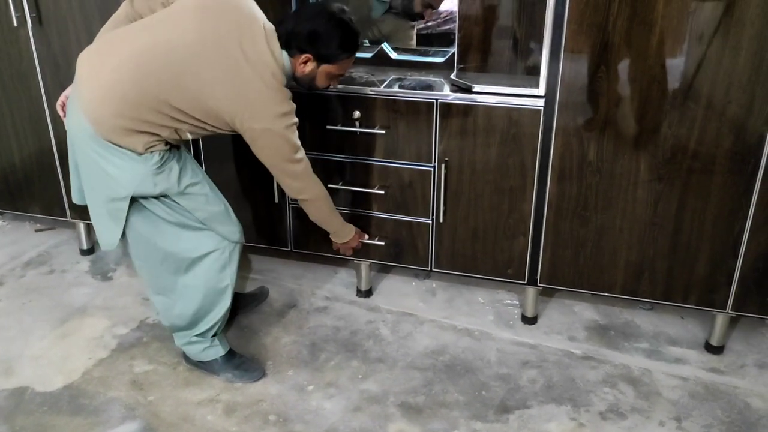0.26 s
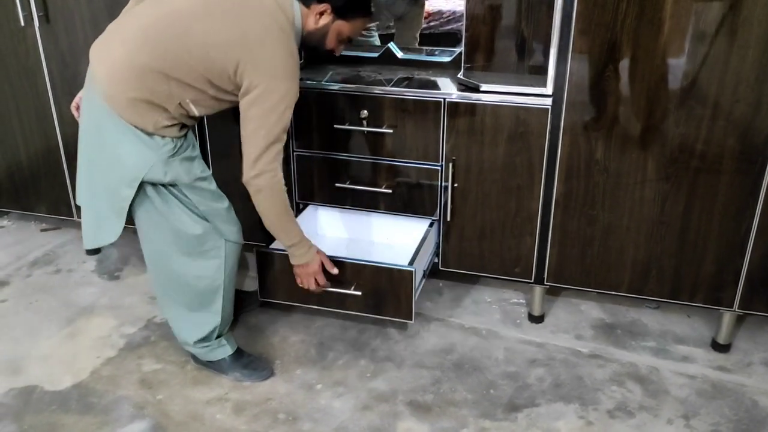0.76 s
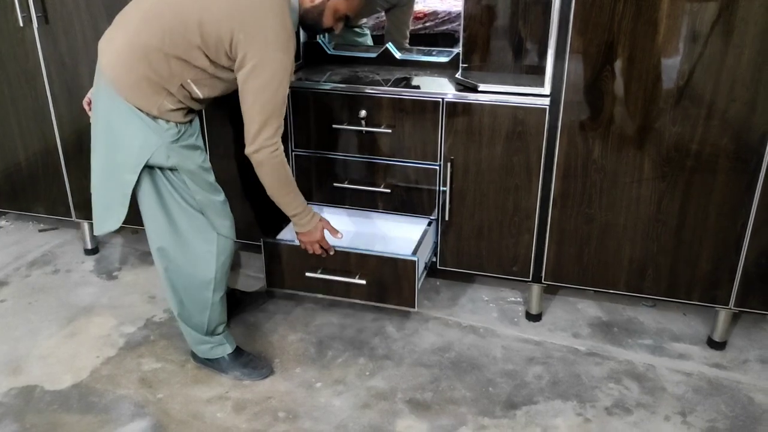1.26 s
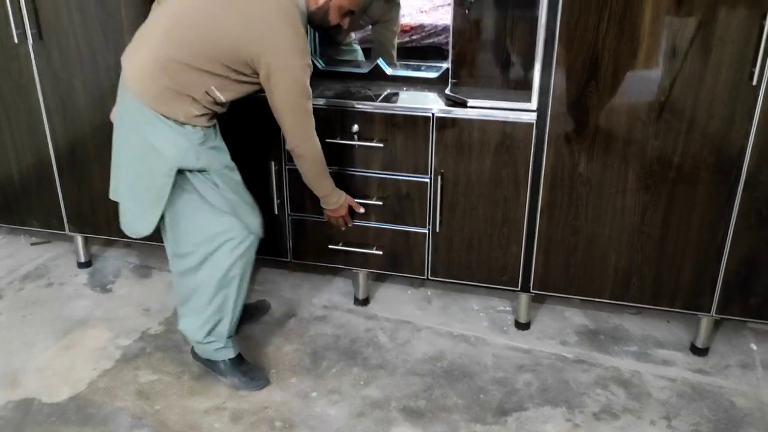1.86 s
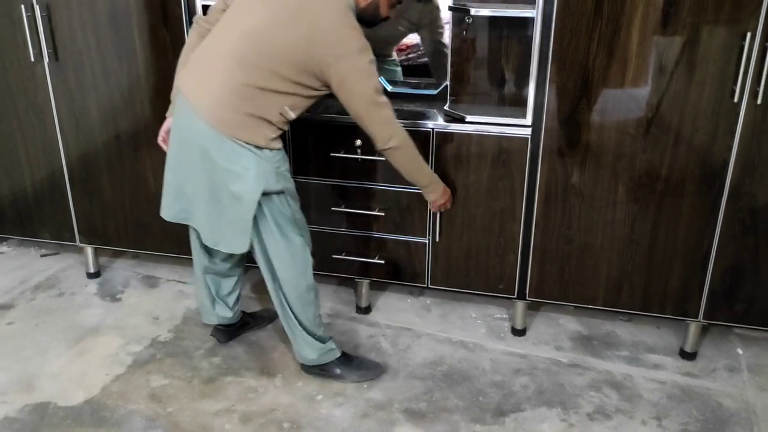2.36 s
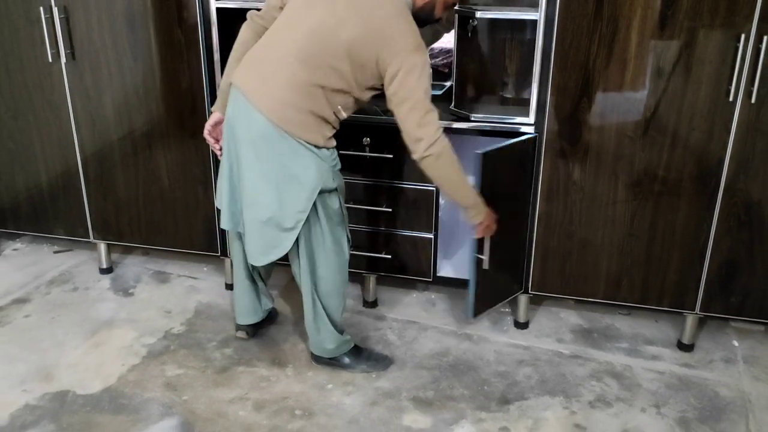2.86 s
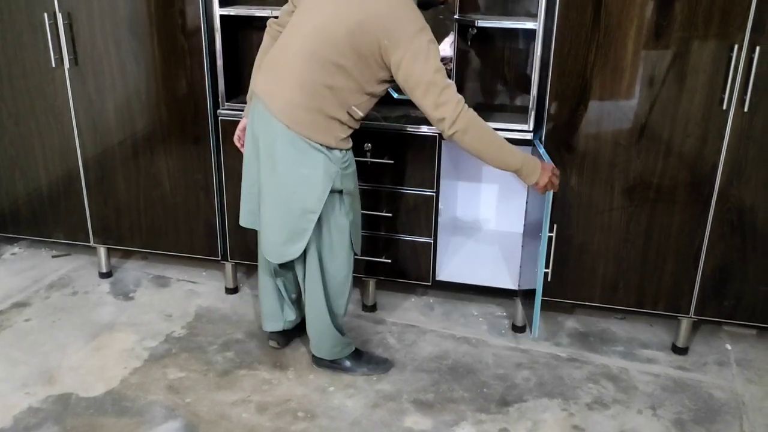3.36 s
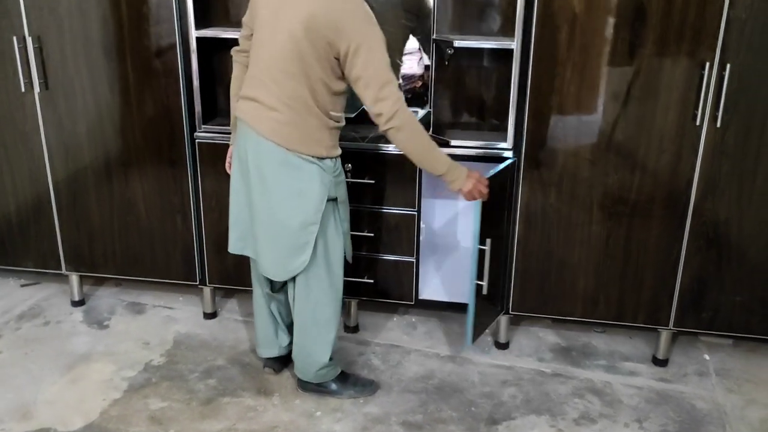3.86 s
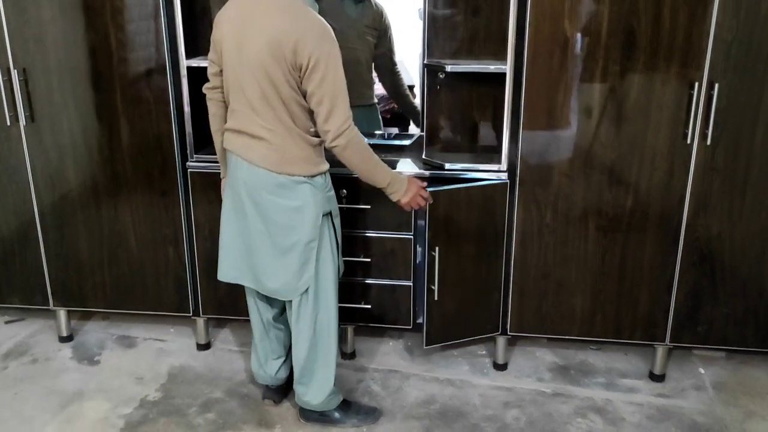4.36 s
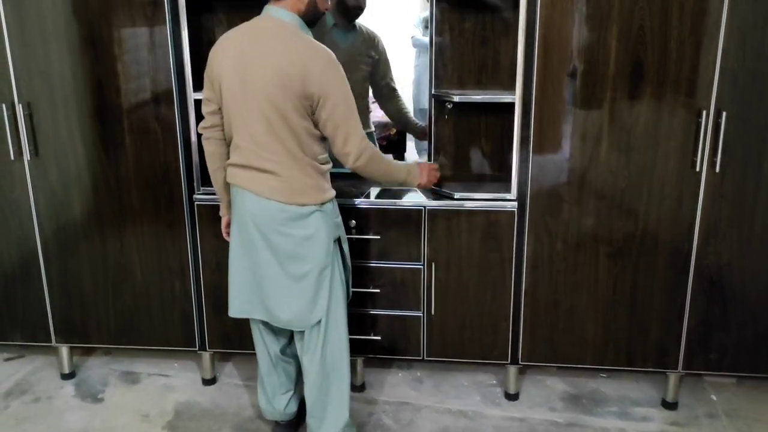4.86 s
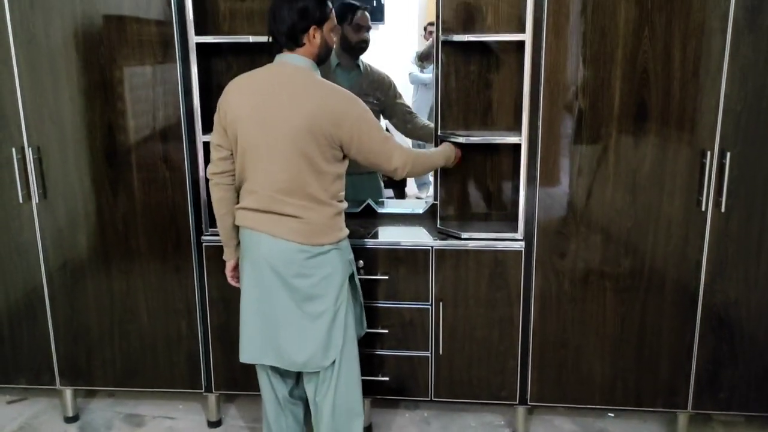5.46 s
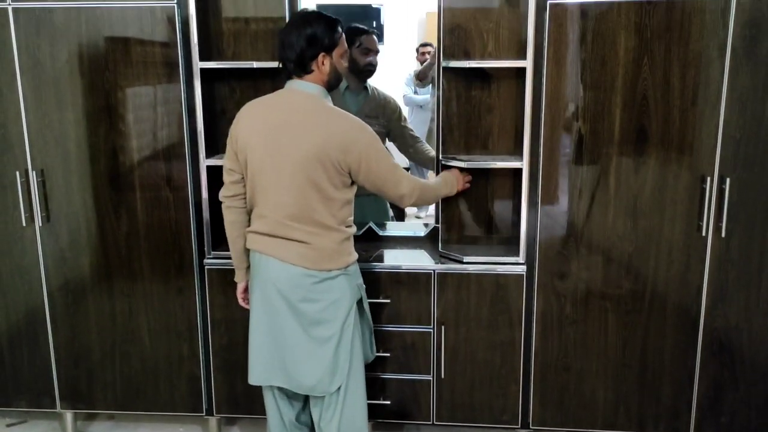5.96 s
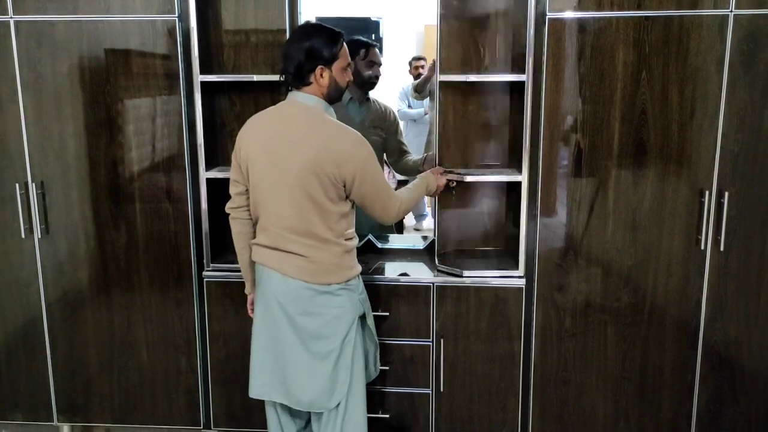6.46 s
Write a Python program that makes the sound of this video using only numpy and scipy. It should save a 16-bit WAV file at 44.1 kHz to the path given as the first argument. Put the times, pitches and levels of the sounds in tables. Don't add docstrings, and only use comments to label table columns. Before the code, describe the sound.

A wooden drawer rumbles on steel runners and bangs shut in an echoing workshop; then a cupboard door slams with a sharp crack, followed by clicks.

```python
import sys
import numpy as np
from scipy import signal
from scipy.fft import rfft, irfft, next_fast_len
from scipy.io import wavfile
from scipy.ndimage import uniform_filter1d, minimum_filter1d, map_coordinates

SR = 44100
rng = np.random.default_rng(int(sys.argv[2]) if len(sys.argv) > 2 else 0)


def digitize_waveform(pressure):
    field = np.atleast_2d(pressure).T
    bounded = np.clip(field, -1, 1)
    quanta = np.round(bounded * 32767).astype(np.int16)
    wavfile.write(sys.argv[1], SR, quanta)


def voltage_ratio(level):
    return 10 ** (np.asarray(level, float) / 20)


N = 296715

# t/s, click peak level/dB, then crack, knock and boom level/dB relative to the click
LOW_DRAWER_BLOWS = [
    (0.4667, -45, -4.5, -14, -22),
    (0.7014, -32.5, -15.5, -15, -32),
    (1.1852, -29, -5, 2.5, -5),
    (1.1914, -38, 8, 15.5, 2.5),
    (1.222, -45.5, -0.5, 9, 18.5),
    (1.4296, -36, -28.5, -31, -18),
    (1.5541, -39.5, -27, -14, -12),
    (1.7748, -36, -31, -41, -16),
]
MID_DRAWER_BLOWS = [
    (1.989, -51, 18.5, 20.5, 11.5),
    (1.9985, -46.5, 12, 5, 16),
    (2.202, -37, -9.5, -21, -20),
    (3.143, -60.5, -8, -18, -2),
    (3.975, -83, 7.5, 6.5, -19),
]
DOOR_BLOWS = [
    (4.1612, -10.5, -15.5, -11, -18),
    (4.1809, -19, -3.5, -14.5, -1.5),
    (4.556, -55.5, -23, -5, 6),
]
GLAZED_BLOWS = [
    (4.8668, -36, -9.5, -18, -28.5),
    (5.0105, -36, -3, -6, -6),
    (5.0145, -20, -7, -20, -22),
    (5.1752, -15, -13.5, -30.5, -37),
    (5.1785, -14.5, -13.5, -34.5, -48),
]
CATCH_BLOWS = [
    (5.8436, -37.5, -2, -9, -20),
    (6.0498, -49, -29, -16, -20.5),
]
TICK_BLOWS = [
    (0.0052, -34, -10, -7.5, -8),
    (0.2218, -43, -5, -13, 0),
    (0.5691, -36, -17.5, -18.5, -23),
    (0.6836, -40.5, -12.5, -10, -18.5),
    (0.7259, -32, -11, -18, -39),
    (1.3951, -35, -39.5, -13, -15),
    (1.6724, -39.5, -7, -20, -16),
]
# f/Hz, width/Hz, level/dB
LOW_DRAWER_WOOD = [(73, 9, -3), (158, 11, -4.5), (208, 8.4, -7), (265, 36, 6), (355, 25, 8),
                   (498, 570, -0.5), (538, 29, 8), (607, 13, 2), (744, 86, 6), (930, 230, -4),
                   (1342, 210, -8.5), (1560, 450, -7), (2900, 2600, -12)]
MID_DRAWER_WOOD = [(69.6, 6.6, 8), (114, 7.6, 7.5), (164, 23, 4), (297, 180, 9.5), (358, 19, 10),
                   (460, 38, -1.5), (560, 140, 10), (640, 68, 10.5), (830, 240, -2.5), (900, 72, -9),
                   (1500, 90, -3.5)]
DOOR_PANEL_WOOD = [(72, 6.7, 3), (172, 23, -2), (231, 12.4, 4), (305, 40, -2), (357, 25, 0.5),
                   (422, 12, -1.5), (504, 27, -2.5), (716, 110, -6.5), (1000, 120, -3.5), (1156, 70, -3.5),
                   (1420, 100, 2), (1750, 460, -5), (3000, 2000, -6)]
GLAZED_FRAME_WOOD = [(71, 2.4, 4.5), (164, 5.9, 5.5), (222, 12, -7), (266, 59, 2.5), (336.6, 33, 7),
                     (563, 180, -4.5), (712, 26, 4.5), (825, 42, -8.5), (1400, 400, -18.5)]
CATCH_PANEL_WOOD = [(328, 13, -10), (727, 40, -3), (890, 63, -12), (2050, 140, -8), (2590, 400, -8),
                    (2990, 170, -2.5), (3470, 300, -13)]
# f/Hz, width/Hz, level/dB
OPEN_DRAWER = [(148, 56, -10.5), (217.4, 44, 0.5), (285, 152, -6.5), (440, 190, -7), (655, 280, -7.5)]
# f/Hz, level/dB per Hz
CLICK_SPECTRUM = [(1940, -33.5), (3200, -21.5), (3990, -8), (4580, -9), (5020, -7), (7290, 1),
                  (8760, -12.5), (10300, -21), (14600, -26.5), (15800, -35)]
CRACK_SPECTRUM = [(500, -34), (850, -9), (1430, -9), (1600, -12), (2100, -6), (3050, -12.5), (3800, -14),
                  (4940, -30), (8360, -120)]
# t/s, level/dB, swell/s, f/Hz, left-right level/dB
STEEL_SNAPS = [(0.5692, -37, 0.0003, 4700, -7), (0.6838, -48, .0007, 6500, -6),
               (0.7003, -38, 0.00073, 7000, -11), (0.7275, -40, 0.00063, 6700, -11),
               (0.9952, -50, 0.002, 6850, 4), (1.001, -45, .0015, 7340, -11),
               (1.1846, -34.5, 0.00071, 4490, 3), (1.1872, -42, 0.0009, 7800, -6),
               (1.3958, -32.5, 0.00049, 4940, -3), (1.7752, -41.5, 0.00056, 6680, -8.5),
               (4.1606, -21.5, 0.0005, 6480, -7.5), (4.1616, -16.5, 0.00048, 8200, -2),
               (4.1632, -16.5, 0.00043, 7000, 1), (4.1652, -20.5, .0006, 6750, 3),
               (4.1772, -20, 0.0005, 6240, 8), (4.1808, -17, 0.00091, 8100, 2),
               (5.0132, -29, 0.00077, 6650, 0.5), (5.0156, -24, 0.00048, 6860, -10),
               (5.0188, -35, 0.00061, 7060, -4), (5.1766, -24, 0.00038, 7300, -15),
               (5.1783, -24.5, 0.00028, 7000, -6), (5.1791, -14, 0.00072, 6940, -9),
               (5.1807, -22, 0.00035, 6960, -11), (5.1822, -23.5, 0.00042, 7100, -8),
               (5.8436, -41, 0.0006, 6400, -7), (5.8462, -46, .001, 6970, -4), (2.7, -44, .0005, 6800, -3),
               (2.836, -46, .0005, 7000, -3), (2.875, -42, .0005, 7000, -3)]
# t/s, level/dB, swell/s, f/Hz, left-right level/dB
PANEL_KNOCKS = [(0.7268, -38, .0015, 1300, -6), (0.7272, -39, .0008, 2700, -2),
                (1.1842, -25, 0.0017, 1800, -2), (1.1862, -29.5, .0008, 2800, 3),
                (1.1965, -18.5, .002, 640, 3), (1.238, -28, .005, 330, 4), (1.995, -43, .004, 1800, -2),
                (2.012, -43, .006, 1420, -2), (2.029, -37, .002, 600, 5), (2.039, -32, .002, 420, -2),
                (2.066, -37.5, .004, 500, 1), (4.163, -24.5, .0012, 2050, -3), (4.1645, -27, .001, 3800, 3),
                (4.169, -37, .002, 900, 2), (4.183, -30.5, .003, 450, 3), (4.194, -23.5, .003, 330, 0),
                (4.202, -28.5, .003, 520, 6), (4.228, -30.5, .005, 420, 3), (4.21, -34, .004, 1430, -1),
                (4.175, -31, .003, 3890, -2.5), (5.1762, -29, .001, 3700, -2),
                (5.1795, -33.5, .001, 1900, -1.5), (5.847, -46, .002, 3060, 0.5),
                (5.858, -51, .006, 2900, 0), (5.872, -61, .02, 790, 2), (5.705, -61.5, .01, 200, 2),
                (5.765, -62.5, .008, 200, 4), (6.635, -65, .014, 330, 6), (6.705, -63.5, .01, 335, 5),
                (6.66, -62, .012, 140, 4), (1.69, -45.5, .008, 200, 4), (4.1855, -21, 0.00051, 1000, 2.5),
                (5.848, -65, 0.005, 10850, 0), (2.82, -52, 0.012, 3900, 0)]
# f/Hz, level/dB, t60/s
LOW_DRAWER_RING = [(212.6, -17, 0.73), (280, -16, 0.89), (319, -14.5, 0.9), (524, -12.5, 0.24),
                   (633, 1, 0.13), (742, -23.5, 0.63), (819, -4, 0.14), (912, -18.5, 0.45),
                   (1290, -36.5, 1.4), (1415, -20.5, 0.56)]
MID_DRAWER_RING = [(199.5, -15, 0.26), (330, -22, 0.14), (440, -23, .38), (558, -23, 0.28),
                   (647, -20, 0.28), (830, -26, .12), (1027, -28.5, 0.56)]
DOOR_PANEL_RING = [(309, -5, 0.46), (428.4, -3, 0.14), (497, -3.5, 0.14), (677, -16.5, 0.52),
                   (1160, -11, 0.2), (1404, -7.5, 0.25), (1460, -12, 0.35), (1780, -17.5, 0.57),
                   (2060, -6, 0.14), (2280, -36.5, 5.0)]
CATCH_PANEL_RING = [(710, -13, 0.1), (796, -31, 1.1), (960, -18.5, 0.64), (2150, -20, 0.29),
                    (2850, -22, 0.76), (3000, -2.5, 0.16)]
GLASS_RING = [(710, -46.5, 0.87), (331, -49, 1), (2250, -55, .5)]
# start t/s, length/s, board level/dB, sides over board level/dB
ROLL_STROKES = [(-.08, 0.2, -38.5, -8), (0.243, 0.061, -53.5, -17), (0.41, 0.32, -53, -9),
                (0.547, 0.27, -48.5, -2.5), (0.75, 0.21, -53, 5.5), (0.923, 0.087, -36, -19),
                (1.258, 0.083, -42, -25.5), (1.657, 0.22, -55.5, -6.5), (2.075, 0.069, -47.5, -20),
                (2.4, 0.29, -72, 1), (2.698, 0.12, -63, 6.5), (4.452, 0.19, -67, 0.5),
                (4.595, 0.11, -64, 1), (4.724, 0.095, -60, -4.5), (5.4, 0.74, -68.5, -6.5),
                (5.75, 0.25, -62.5, -23), (6.134, 0.36, -81.5, 7.5), (6.623, 0.076, -69.5, -5.5)]
# start t/s, length/s,
# grit level/dB, scrape over grit level/dB
SCUFF_STROKES = [(-.03, 0.08, -42.5, -6), (0.1, 0.056, -71.5, 14.5), (0.306, 0.37, -58.5, -5),
                 (0.47, 0.34, -57.5, 0.5), (0.673, 0.15, -42, -6), (0.85, 0.26, -53, -4.5),
                 (1.387, 0.066, -50.5, -26), (1.523, 0.029, -54, -5.5), (1.72, 0.079, -50, -8.5),
                 (1.842, 0.2, -44.5, -16), (2.066, 0.11, -45, -14), (2.256, 0.092, -57, 0.5),
                 (2.333, 0.39, -49, -6.5), (2.654, 0.25, -45, -9.5), (3.949, 0.062, -75, 3.5),
                 (4.417, 0.27, -63, 5), (4.729, 0.089, -66, 11), (4.857, 0.042, -54.5, 2),
                 (5.306, 0.25, -69, 4.5), (5.564, 0.098, -62, -5), (5.702, 0.16, -76, 4),
                 (5.85, 0.29, -67, -1), (6.202, 0.19, -68.5, -2), (6.441, 0.15, -66, -3.5)]
# start t/s, length/s, level/dB
SLAB_STROKES = [(-.05, 0.18, -49.5), (0.954, 0.1, -54.5), (1.24, 0.052, -40.5), (1.66, 0.1, -54),
                (1.92, .06, -51), (2.1, .1, -54.5), (2.392, 0.15, -60), (4.53, 0.14, -62),
                (5.046, 0.062, -52), (5.35, 0.1, -72), (5.957, 0.081, -72)]
IDLE_DB = [-72, -83.5, -77, -83, -79]
# f/Hz, level/dB per Hz
GRIT_SPECTRUM = [(1940, -33.5), (3300, -13), (4520, -12), (6110, -8), (7060, -4.5), (8930, -17),
                 (9860, -27), (12100, -34), (14800, -33.5), (15800, -39)]
SCRAPE_SPECTRUM = [(470, -14), (800, -5), (1130, -2), (1540, -4.5), (2830, -4), (3800, -14.5),
                   (4940, -24.5), (8360, -120)]
SLAB_SPECTRUM = [(20, -12.5), (40, -1.5), (72, -8.5), (100, -2.5), (140, -19), (300, -120)]
# t/s, level/dB, length/s
DRAWER_THROBS = [
    (0.947, -40, 0.061),
    (0.975, -30, 0.089),
    (1.017, -27, 0.035),
    (1.033, -32, 0.032),
    (1.056, -35, .035),
    (1.076, -27, 0.022),
    (1.097, -29.5, 0.019),
    (1.122, -42.5, 0.068),
    (1.153, -40, 0.042),
]
# start t/s, length/s, level/dB
HINGE_SLIPS = [
    (5.596, 0.068, -68.5),
    (5.642, 0.055, -60),
    (5.71, 0.066, -65.5),
]
# start t/s, length/s, level/dB
CLOTH_SWISHES = [
    (0.686, 0.13, -54.5),
    (1.4, 0.05, -63),
    (1.532, 0.04, -54.5),
    (2.373, 0.24, -59),
]
# f/Hz, level/dB per Hz
CLOTH_SPECTRUM = [(5000, -40), (8500, 2), (10000, -5), (15000, -13), (15800, -25.5)]
# start t/s, length/s, level/dB, f/Hz
MOTOR_NOTES = [
    (2.453, 0.77, -72, 121),
    (3.419, 0.31, -72, 170),
    (3.744, 0.27, -79, 158),
    (5.62, 0.11, -69, 189),
    (5.904, 0.12, -66, 167.6),
    (6.197, 0.52, -74.5, 137.2),
]
# f/Hz, level/dB per Hz
AIR_SPECTRUM = [(12, -30), (20, 3), (33, -15), (76, -9.5), (103, -32.5), (139, -8), (160, -9), (178, -8),
                (249, -32.5), (286, -26), (398, -25), (484, -28), (2550, -33), (7100, -40.5), (15000, -60)]
# f/Hz, t60/s
HALL_DECAY = [(60, 0.24), (160, 0.76), (420, 0.73), (1100, 0.7), (2910, 0.59), (7680, 0.5), (12000, 0.33)]
# f/Hz, left-right likeness
PAIR_LIKENESS = [(60, .96), (200, .95), (400, .85), (700, .6), (1300, -.2), (2400, .05), (4500, -.15),
                 (7200, -.05), (8500, .6), (12000, .05)]
# f/Hz, left-right level/dB
PAIR_TILT = [(60, 4.5), (150, 4.5), (380, 4.5), (950, 1), (2380, 0), (5980, -3.0), (15000, -2.5)]
# f/Hz, share
PHONE_GAPS = [(2200, 0), (3200, .12), (5000, .17), (6000, .1), (7800, .08), (8800, .5), (9800, .66),
              (11000, .58), (15500, .52)]

BOOM_HZ, SOFT_HZ = 225, 3570
SHEEN_HZ, TOP_HZ = 9400, 15550
LEFT_LATE_S = .00036
SNAP_SPREAD = .09
SCUFF_RISE, ROLL_RISE, SLAB_RISE = 0.46, 0.39, 0.28
SCUFF_FADE, ROLL_FADE, SLAB_FADE = 105, 115, 80
BOARD_HZ, BOARD_SAG = 222, 120
UPPER_HZ, UPPER_DB = 329, -11.5
GROAN_HZ, GROAN_SAG = 648, 20
RUMBLE_CUT_HZ = 32


def unit(x):
    return x / np.sqrt(np.mean(np.abs(x) ** 2) + 1e-20)


def along(points, hz):
    f, v = np.transpose(points)
    return np.interp(np.log(hz + 1), np.log(f + 1), v)


def wobble(rate):
    knots = rng.standard_normal(int(N * rate / SR) + 4)
    return map_coordinates(knots, [np.arange(N) * rate / SR])


def resonant(peaks, f):
    total = 0
    for k, (centre, width, db) in enumerate(peaks):
        damping = 1j * f * width
        total = total + (-1) ** k * voltage_ratio(db) * damping / (centre * centre - f * f + damping + 1e-9)
    return total


def left_right(db):
    return voltage_ratio(np.outer([.5, -.5], db))


def spread(pair, hz):
    turn = np.arccos(np.clip(along(PAIR_LIKENESS, hz), -.9, 1)) / 2
    mid, side = np.cos(turn) * pair[0], np.sin(turn) * pair[1]
    return np.array([mid + side, mid - side]) * left_right(along(PAIR_TILT, hz)) * voltage_ratio(-25 * (hz > TOP_HZ))


def rush(response, patchy_db, grain_db, rate):
    z = signal.stft(rng.standard_normal((2, N)), nperseg=512)[2]
    field = uniform_filter1d(rng.standard_normal(z.shape[1:]), size=6, axis=0)
    field = uniform_filter1d(field, size=10, axis=1)
    patchy = signal.istft(z * voltage_ratio(patchy_db * unit(field)), nperseg=512)[1][:, :N]
    pair = patchy * voltage_ratio(grain_db * wobble(rate))
    m = next_fast_len(N + 8192)
    hz = np.fft.rfftfreq(m, 1 / SR)
    return unit(irfft(spread(rfft(pair, m), hz) * response(hz), m)[:, :N])


def shaped_rush(spectrum, **grain):
    return rush(lambda hz: voltage_ratio(along(spectrum, hz)), **grain)


def strokes(start, length, db, rise, fade, rest_db=-120):
    t = np.arange(0, N + 64, 64) / SR - np.reshape(start, (-1, 1))
    length, db = np.reshape(length, (-1, 1)), np.reshape(db, (-1, 1))
    swell = np.clip(t / (np.clip(rise, .02, 1) * length), 0, 1)
    gain = swell * voltage_ratio(db - fade * np.maximum(t - length, 0))
    power = np.sum(gain ** 2, axis=0) + voltage_ratio(rest_db) ** 2
    return np.interp(np.arange(N) / 64, np.arange(len(power)), np.sqrt(power))


def echo(size):
    hz, t, z = signal.stft(rng.standard_normal((2, size)), SR, nperseg=256)
    decay = voltage_ratio(-60 * t / along(HALL_DECAY, hz)[:, None])
    tail = signal.istft(z * decay, SR, nperseg=256)[1][:, :size]
    tail = tail * (1 - np.exp(-np.arange(size) / SR / 0.0018))
    return tail / np.linalg.norm(tail[0])


def contacts(events, wood, direct_db, top_db, dull_db, pan_db, sheen_hz=SHEEN_HZ, lag_s=-.00012):
    out, m, lead = np.zeros((2, N + 2 * SR)), 65536, 256
    hz, t = np.fft.rfftfreq(m, 1 / SR), np.arange(1024) / SR
    tilt = along(PAIR_TILT, hz)
    highs = [p for p in wood if p[0] > BOOM_HZ]
    lows = [p for p in wood if p[0] <= BOOM_HZ] or wood[:1]
    knock = unit(resonant(highs, hz) / (1 + 1j * hz / SOFT_HZ) ** 2)
    boom = unit(resonant(lows, hz))
    standing = unit(boom * resonant([(c, 4 * w, 0) for c, w, db in lows], hz)) * left_right(tilt)
    click_shape = voltage_ratio(along(CLICK_SPECTRUM, hz) + top_db * (hz > sheen_hz))
    crack_shape = voltage_ratio(along(CRACK_SPECTRUM, hz) - dull_db * np.log2(1 + hz / 1000))
    lag = np.exp(np.outer([-1j, 1j], np.pi * hz * lag_s))
    direct = voltage_ratio(direct_db - 25 * (hz > TOP_HZ)) * left_right(pan_db + tilt) * lag
    for s, db, crack_db, knock_db, boom_db in events:
        envelope = voltage_ratio(-60 * t / 0.022) * np.minimum(t / 0.00026, 1)
        burst = rfft(rng.standard_normal(len(t)) * envelope, m)
        burst = burst / (np.abs(burst) + 1e-9) ** 0.73
        blow = voltage_ratio(-3.0) * unit(burst * click_shape) + voltage_ratio(crack_db + 0.5) * unit(burst * crack_shape)
        blow = blow + voltage_ratio(knock_db + 5.0) * knock + voltage_ratio(boom_db + 4.5) * boom
        path = direct + spread(rfft(echo(size=40000), m), hz)
        heard = irfft(blow * path + voltage_ratio(boom_db + 2.5) * standing, m)
        sound = np.roll(heard, lead, axis=1)[:, :SR]
        sound[:, :lead] *= np.linspace(0, 1, lead) ** 8
        start = round(s * SR)
        out[:, start:start + SR] += voltage_ratio(db + 23.5) * sound
    return out[:, lead:N + lead]


def drawers():
    low = contacts(LOW_DRAWER_BLOWS, LOW_DRAWER_WOOD, direct_db=-7.0, top_db=0.5, dull_db=6, pan_db=-3.5)
    middle = contacts(MID_DRAWER_BLOWS, MID_DRAWER_WOOD, direct_db=-15.0, top_db=3.5, dull_db=7.0, pan_db=0.5)
    ticks = contacts(TICK_BLOWS, OPEN_DRAWER, direct_db=-7.0, top_db=-6.5, dull_db=5.5, pan_db=-9.0)
    return low + middle + ticks


def doors():
    cupboard = contacts(DOOR_BLOWS, DOOR_PANEL_WOOD, direct_db=-11.5, top_db=6.0, dull_db=3.0, pan_db=-9.5,
                        sheen_hz=8250, lag_s=LEFT_LATE_S)
    glazed = contacts(GLAZED_BLOWS, GLAZED_FRAME_WOOD, direct_db=-15.5, top_db=-6.5, dull_db=-7.5, pan_db=-1.5,
                      lag_s=LEFT_LATE_S)
    catch = contacts(CATCH_BLOWS, CATCH_PANEL_WOOD, direct_db=-13.0, top_db=-8.0, dull_db=-7.5, pan_db=0,
                     sheen_hz=7100)
    return cupboard + glazed + catch


def snaps(events):
    out, t = np.zeros((2, N + SR)), np.arange(4096) / SR
    share = np.array([[1.3], [.45], [.45]])
    for s, db, swell, hz, pan_db in events:
        luck = rng.standard_normal((4, 3, 1))
        pitch = hz * np.exp(SNAP_SPREAD * luck[0] * [[0], [1], [1]])
        phase = 2 * luck[1] + min(hz / 2500, 1.2) * luck[2:]
        tone = np.sum(share * np.sin(2 * np.pi * pitch * t + phase), axis=1)
        envelope = (t / swell * np.exp(1 - t / swell)) ** 2
        out[:, round(s * SR):][:, :len(t)] += voltage_ratio(db) * left_right(pan_db) * envelope * tone
    return out[:, :N]


def ringing(s, modes, db, swell):
    out, t = np.zeros((2, N)), np.arange(int(.6 * SR)) / SR
    apart = np.array([[.5], [-.5]])
    for hz, level_db, t60 in modes:
        between = np.arccos(np.clip(along(PAIR_LIKENESS, hz), -1, 1))
        phase = rng.uniform(0, 2 * np.pi) + apart * between
        fade_db = level_db - 60 * t / np.clip(t60, .05, 1) + 4.1 * wobble(35)[:len(t)]
        fade_db = fade_db + apart * along(PAIR_TILT, hz)
        tone = np.sin(2 * np.pi * hz * t + phase)
        out[:, round(s * SR):][:, :len(t)] += voltage_ratio(db + fade_db) * (1 - np.exp(-t / swell)) * tone
    return out


def panels():
    out = ringing(1.189, LOW_DRAWER_RING, db=-17.0, swell=0.0063)
    out += ringing(2.001, MID_DRAWER_RING, db=-15.0, swell=0.0045)
    out += ringing(4.163, DOOR_PANEL_RING, db=-19.5, swell=0.013)
    out += ringing(5.015, GLASS_RING, db=0.0, swell=0.014)
    out += ringing(5.845, CATCH_PANEL_RING, db=-40, swell=0.0073)
    return out


def rolling():
    s, length, db, over_db = np.transpose(ROLL_STROKES)
    board_gain = strokes(s, length, db, ROLL_RISE, ROLL_FADE, IDLE_DB[2])
    sides_gain = strokes(s, length, db + over_db, ROLL_RISE, ROLL_FADE, IDLE_DB[3])
    board = rush(lambda hz: resonant(OPEN_DRAWER[:3], hz), patchy_db=1., grain_db=1.5, rate=25)
    sides = rush(lambda hz: resonant(OPEN_DRAWER[3:], hz), patchy_db=1., grain_db=1.5, rate=40)
    return board_gain * board + sides_gain * sides


def jolt():
    t = np.arange(N) / SR
    out = np.zeros(N)
    upper = voltage_ratio(UPPER_DB) * np.sin(2 * np.pi * UPPER_HZ * t)
    for s, db, length in DRAWER_THROBS:
        swell = np.exp(-((t - s) / length * 4.4) ** 2)
        hz = BOARD_HZ - BOARD_SAG * (s - DRAWER_THROBS[0][0])
        out += voltage_ratio(db) * swell * (np.sin(2 * np.pi * hz * t) + upper)
    return out


def hinge():
    t = np.arange(N) / SR
    pitch = GROAN_HZ - GROAN_SAG * (t - HINGE_SLIPS[0][0])
    turn = 2 * np.pi * np.cumsum(pitch * (1 + .022 * wobble(90))) / SR
    rough = wobble(120) * np.sin(1.78 * turn) + wobble(90) * np.sin(2 * turn)
    tone = np.sin(turn) + voltage_ratio(-16) * rough
    return strokes(*np.transpose(HINGE_SLIPS), rise=.16, fade=160) * voltage_ratio(2 + 3.2 * wobble(70)) * tone


def sandals():
    s, length, db, over_db = np.transpose(SCUFF_STROKES)
    grit_gain = strokes(s, length, db, SCUFF_RISE, SCUFF_FADE, IDLE_DB[0])
    scrape_gain = strokes(s, length, db + over_db, SCUFF_RISE, SCUFF_FADE, IDLE_DB[1])
    slab_gain = strokes(*np.transpose(SLAB_STROKES), SLAB_RISE, SLAB_FADE, IDLE_DB[4])
    grit = shaped_rush(GRIT_SPECTRUM, patchy_db=1.8, grain_db=1.8, rate=260)
    scrape = shaped_rush(SCRAPE_SPECTRUM, patchy_db=1.6, grain_db=1.2, rate=60)
    slab = shaped_rush(SLAB_SPECTRUM, patchy_db=.8, grain_db=1.2, rate=8)
    return grit_gain * grit + scrape_gain * scrape + slab_gain * slab


def cloth():
    gain = strokes(*np.transpose(CLOTH_SWISHES), rise=0.24, fade=200)
    return gain * shaped_rush(CLOTH_SPECTRUM, patchy_db=-0.5, grain_db=2.0, rate=100)


def motor():
    turn = 2 * np.pi * np.cumsum(1 + 0.025 * wobble(4.9)) / SR
    hum = np.zeros(N)
    for s, length, db, hz in MOTOR_NOTES:
        hum += strokes(s, length, db, rise=0.38, fade=90) * np.sin(hz * turn)
    return voltage_ratio(3.0 + 2.3 * wobble(5.0)) * hum


def air():
    return voltage_ratio(-70) * shaped_rush(AIR_SPECTRUM, patchy_db=.8, grain_db=.6, rate=6)


def scene():
    blows = drawers() + doors() + snaps(STEEL_SNAPS) + snaps(PANEL_KNOCKS) + panels()
    rubbing = rolling() + sandals() + cloth()
    tones = (jolt() + hinge() + motor()) * voltage_ratio([[1.8], [-1.8]])
    return blows + rubbing + tones + air()


def starved(x):
    hz, t, z = signal.stft(x, SR, nperseg=1024)
    bands = np.repeat(rng.random((len(hz) // 4 + 1, len(t) // 6 + 2)), 6, axis=1)
    staggered = [np.roll(row, 2 * rng.integers(3)) for row in bands]
    luck = np.repeat(staggered, 4, axis=0)[:len(hz), :len(t)]
    power = np.sum(np.abs(z[:, hz > 3000]) ** 2, axis=(0, 1))
    calm = minimum_filter1d(1. * (power < 3 * np.roll(power, 1)), size=2, origin=-1)
    busy = power > 3 * np.percentile(power, 20)
    empty = calm * busy * (luck < along(PHONE_GAPS, hz)[:, None])
    return signal.istft(z * (1 - .995 * empty), SR, nperseg=1024)[1][:, :N]


def band_limit(x):
    return signal.sosfilt(signal.butter(12, 16450, fs=SR, output="sos"), x)


def record(dry):
    rumble_cut = signal.butter(2, RUMBLE_CUT_HZ, "high", fs=SR, output="sos")
    mix = starved(signal.sosfilt(rumble_cut, dry))
    return band_limit(mix)


dry = scene()
out = record(dry)
digitize_waveform(out)
```